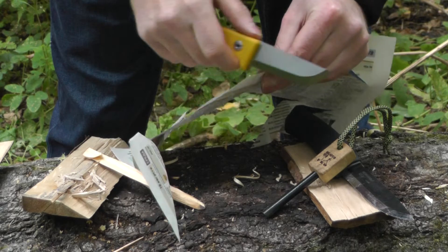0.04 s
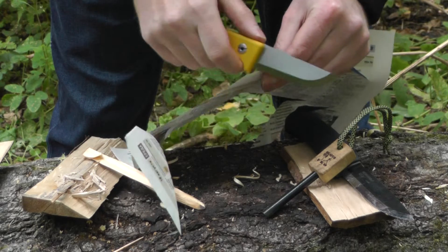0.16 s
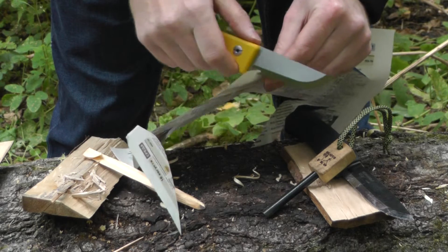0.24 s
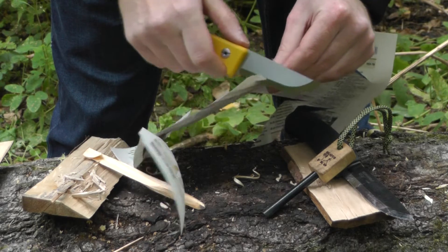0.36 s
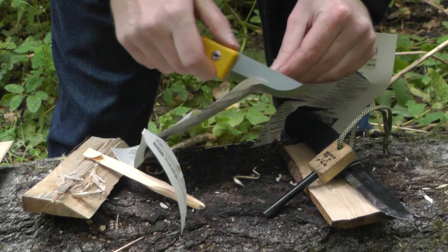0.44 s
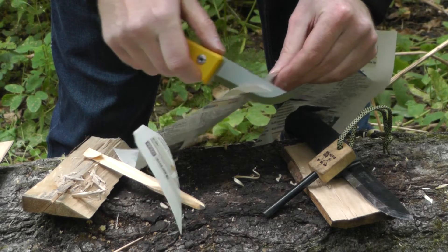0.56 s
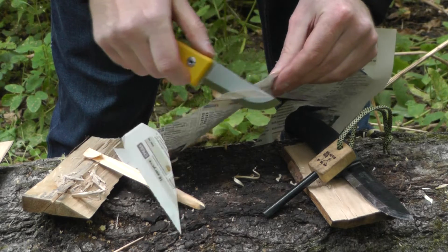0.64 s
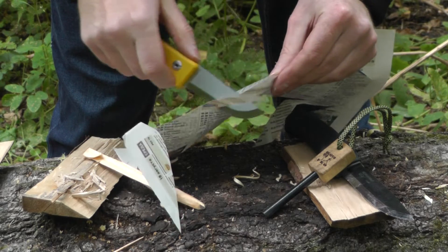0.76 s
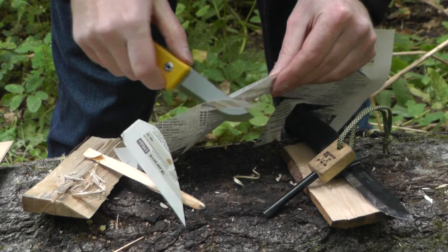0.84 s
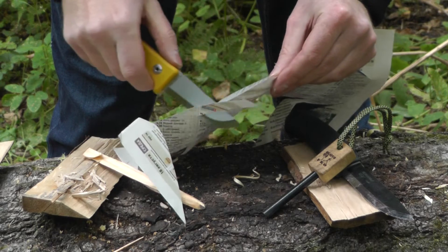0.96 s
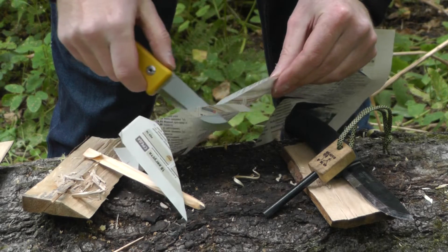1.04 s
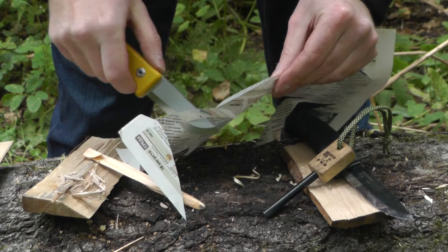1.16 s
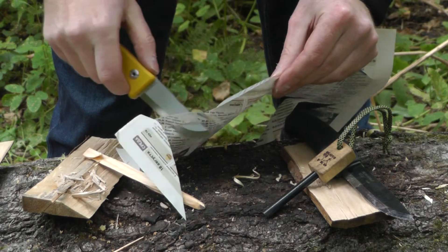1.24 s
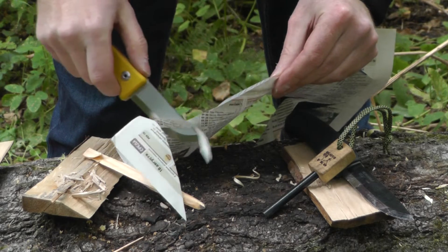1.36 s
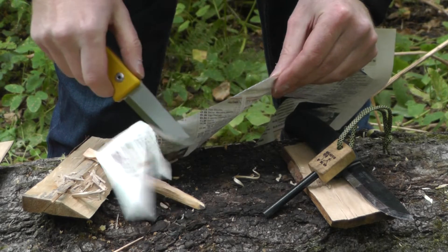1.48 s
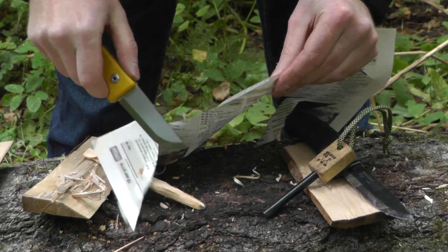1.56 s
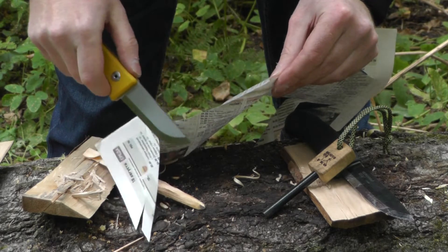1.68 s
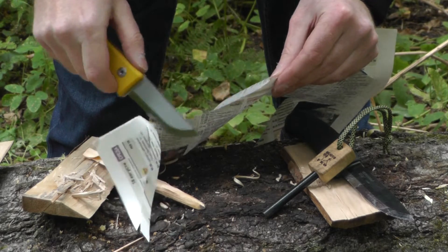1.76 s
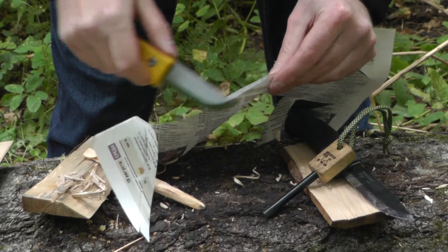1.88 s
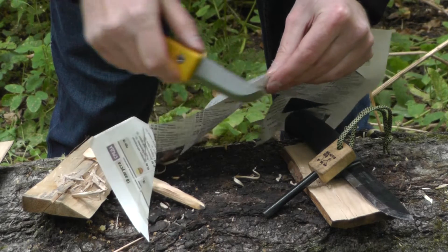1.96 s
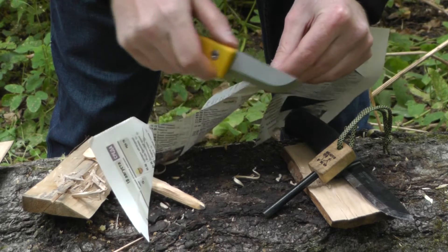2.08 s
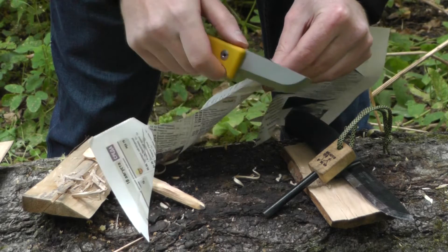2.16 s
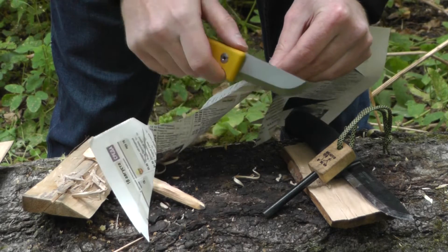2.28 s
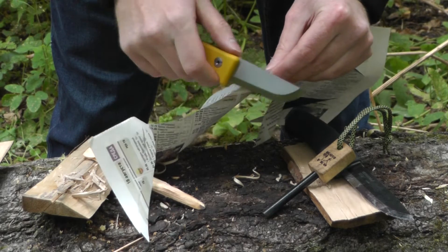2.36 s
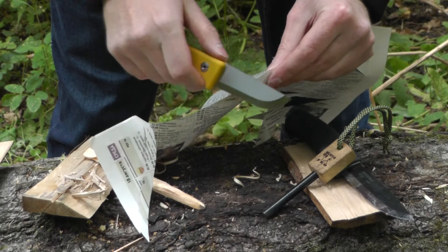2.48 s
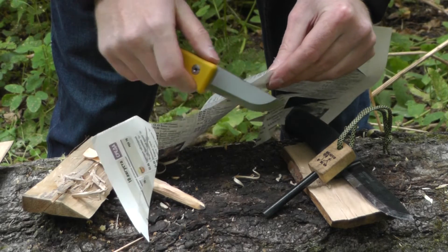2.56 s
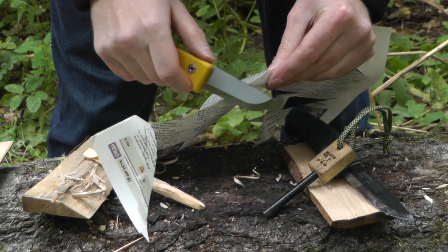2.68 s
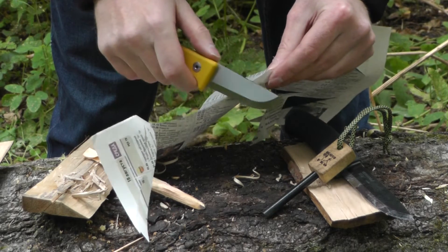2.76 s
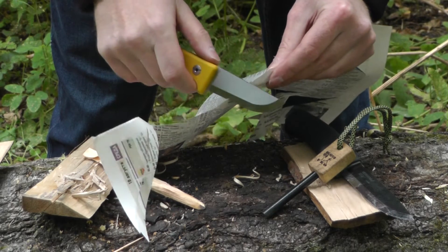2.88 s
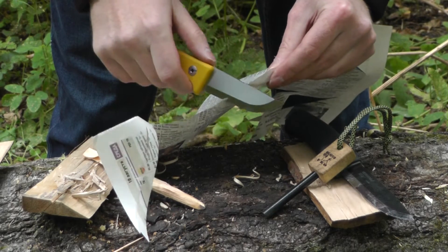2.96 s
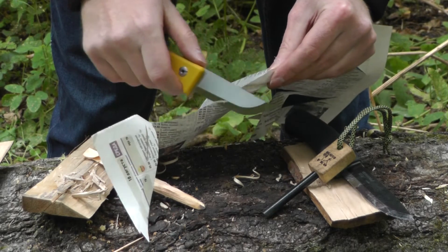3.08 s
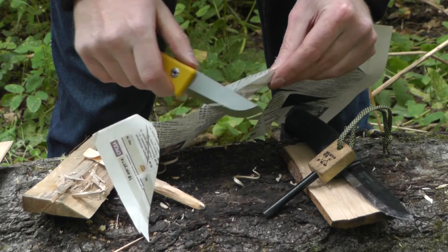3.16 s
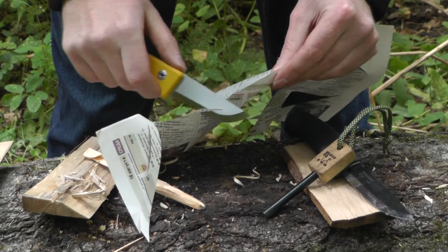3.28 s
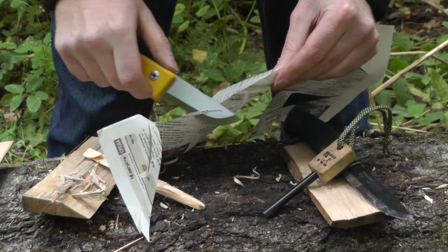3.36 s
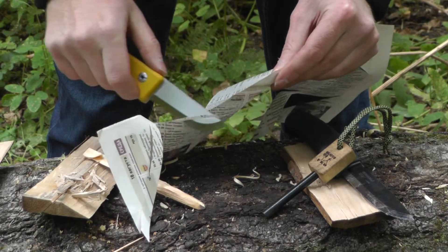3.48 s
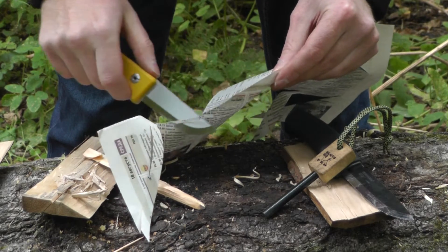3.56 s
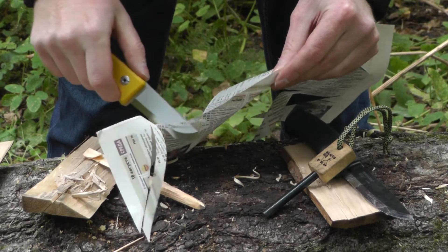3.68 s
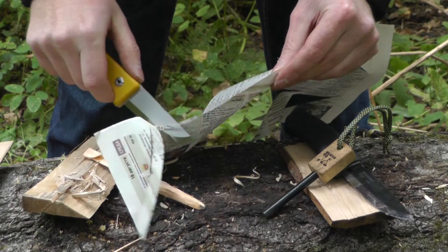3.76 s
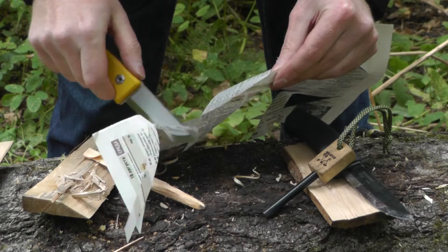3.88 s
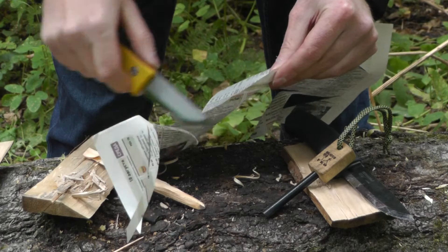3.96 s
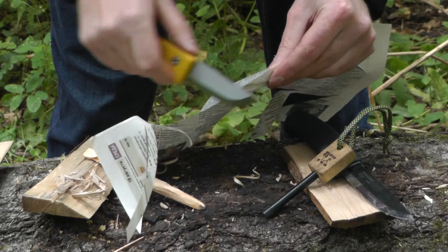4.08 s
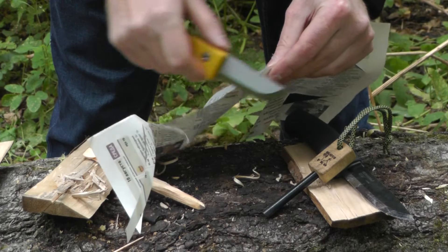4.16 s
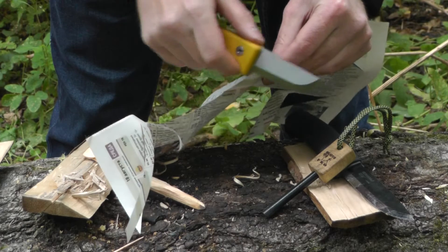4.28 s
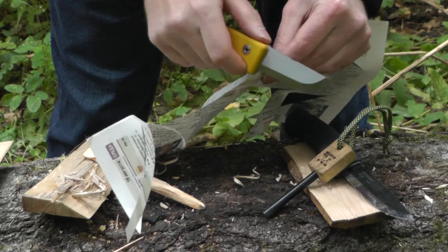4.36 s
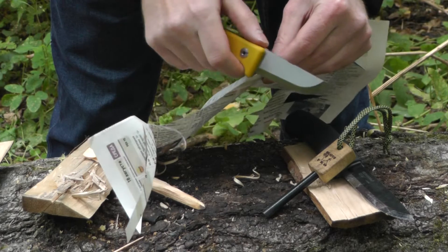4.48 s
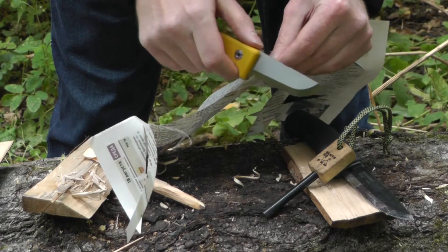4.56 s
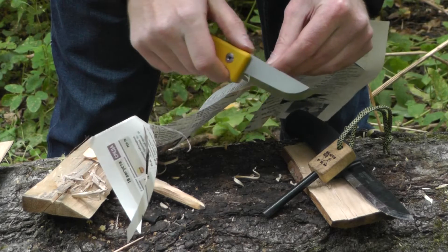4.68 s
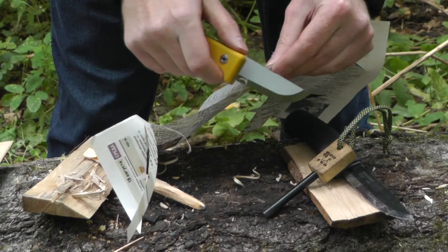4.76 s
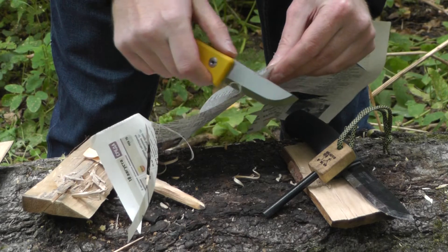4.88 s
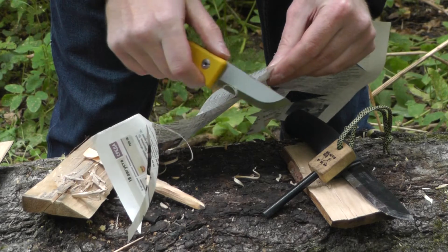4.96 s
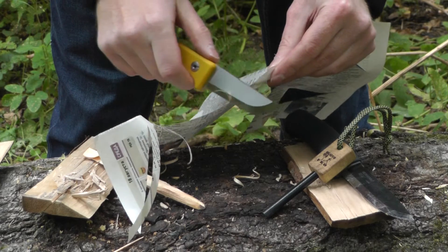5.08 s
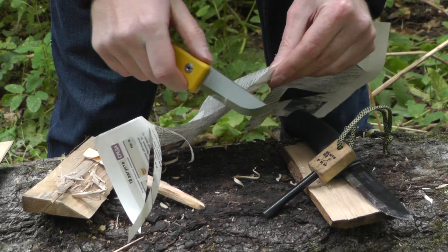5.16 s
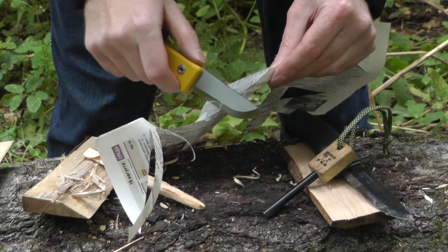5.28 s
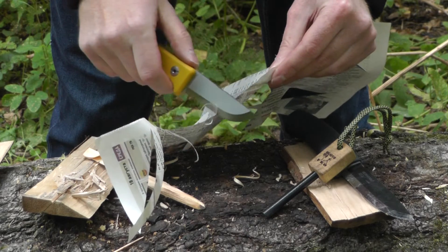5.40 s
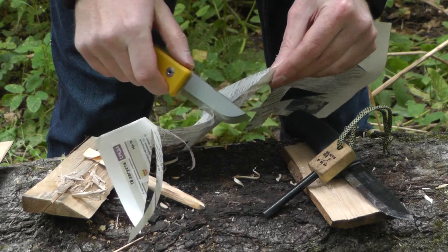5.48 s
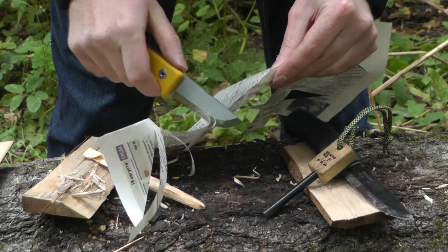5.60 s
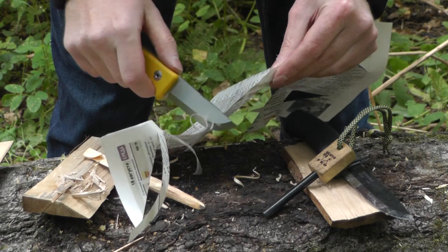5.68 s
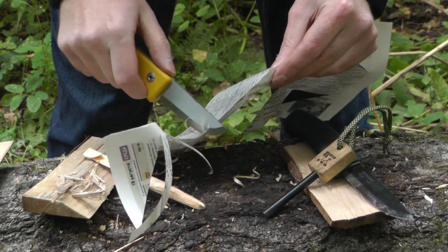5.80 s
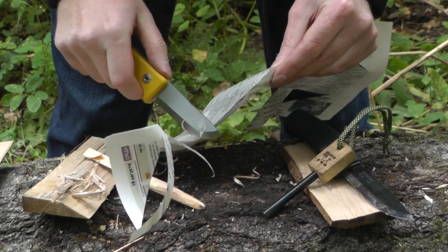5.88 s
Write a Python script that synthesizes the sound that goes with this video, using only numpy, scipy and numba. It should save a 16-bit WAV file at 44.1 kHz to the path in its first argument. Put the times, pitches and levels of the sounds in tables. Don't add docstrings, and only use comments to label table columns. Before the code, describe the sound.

A sharp knife slices a hand-held sheet of newsprint in three long rasping strokes, with crisp paper pops and faint rustles between, over distant road hum.

```python
import sys
import numpy as np
from scipy import signal
from scipy.fft import rfft, irfft
from scipy.io import wavfile
from scipy.ndimage import uniform_filter1d, map_coordinates
from numba import njit

SR = 44100
rng = np.random.default_rng(int(sys.argv[2]) if len(sys.argv) > 2 else 0)


def generate_wav(sig):
    pcm = np.round(np.clip(np.atleast_2d(sig).T, -1, 1) * 32767).astype(np.int16)
    wavfile.write(sys.argv[1], SR, pcm)


def undo_db(level):
    steps = np.asarray(level, float) / 20
    return 10 ** steps


N = 261505

FOLDED_HZ = 3850
LEVEL_LAG_MS = .42


def unit(x):
    return x / np.sqrt(np.mean(x ** 2))


def noise(shape=N):
    return rng.standard_normal(shape)


@njit
def svf(x, hz, width):
    y, band, low = np.empty(len(x)), 0., 0.
    for i in range(len(x)):
        g, k = np.tan(np.pi * hz[i] / SR), width / hz[i]
        v = (band + g * (x[i] - low)) / (1 + g * (g + k))
        band, low, y[i] = 2 * v - band, low + 2 * g * v, k * v
    return y


def ring(x, hz, width):
    return unit(svf(x, hz + np.zeros(len(x)), 1. * width))


def ring_twice(x, hz, width):
    return ring(ring(x, hz, width), hz, width)


def colour(x, points):
    hz, db = np.transpose(points)
    grid = np.maximum(np.arange(2049) * SR / 4096, 1)
    ceps = irfft(np.interp(np.log(grid), np.log(hz), db) * np.log(10) / 20)
    ceps[1:2048] *= 2
    ceps[2049:] = 0
    response = irfft(np.exp(rfft(ceps)))
    return unit(signal.fftconvolve(x, response)[:len(x)])


def walk(rate):
    k = int(SR / rate)
    steps = np.repeat(noise(N // k + 1), k)
    return unit(uniform_filter1d(uniform_filter1d(steps, k), k)[:N])


def along(table):
    s, *columns = np.transpose(table)
    return [np.interp(np.arange(N) / SR, s, c) for c in columns]


def follow(tables):
    t = np.arange(N) / SR
    on = sum((t >= table[0][0]) & (t < table[-1][0]) for table in tables)
    level_db, *others = along(np.vstack(tables))
    return [undo_db(level_db) * uniform_filter1d(1. * on, size=200)] + others


def fibres(rate, spread_db, smooth, judder_db):
    draw = rng.random((3, N))
    size = undo_db(-spread_db * np.log(draw[2] + 0.0032))
    snaps = (draw[0] < rate / SR) * np.sign(draw[1] - .5) * size
    judder = undo_db(judder_db * (walk(300) + 0.16 * walk(70)))
    return unit((unit(snaps) + smooth * noise()) * judder)


# f/Hz, level/dB [dB per Hz]
ROAD_SPECTRUM = [(15, -81), (25, -7.5), (137, -6), (222, -6), (352, -2.5), (748, 1.5), (980, -5),
                 (1150, -8.5), (1250, -10.5), (1470, -16), (2450, -21), (2810, -23.5), (4440, -27),
                 (5510, -29.5), (15800, -42)]


def woodland():
    swell_db = .3 * walk(2) + .4 * walk(9)
    hum = colour(noise(), ROAD_SPECTRUM) * undo_db(-49.5 + swell_db)
    return hum + undo_db(-66.5) * ring(noise(), 254, 8.6)


# start t/s, end t/s, first level/dB, last level/dB
STIRRINGS = [(0, .25, -71, -82), (1.66, 1.75, -65, -60.5), (1.765, 1.807, -75, -53),
             (1.833, 1.928, -65, -61), (1.93, 2, -57, -46), (2.009, 2.2, -56, -70),
             (2.204, 2.288, -57.5, -54), (2.292, 2.595, -65, -72), (2.85, 2.904, -56, -63),
             (3.906, 4.095, -61.5, -62.5), (4.108, 4.221, -66, -61), (4.256, 4.28, -54, -75),
             (4.29, 4.447, -55, -71)]


def stirring():
    gain, = follow([[(s, first), (end, last)] for s, end, first, last in STIRRINGS])
    crackle = fibres(rate=1400, spread_db=2.0, smooth=0.8, judder_db=2.2)
    body = ring(ring(crackle, 3040, 4600), 3200, 4700)
    return gain * (body + undo_db(-14.0) * sizzle(crackle))


# t/s, lag/ms by the log, lag/ms by the blade, lag/ms by the hands, strength of the log echo [0-1]
ECHO_PATHS = [(.27, .592, .348, .594, .12), (.81, .392, .295, .517, .6), (1.11, .314, .27, .486, .6),
              (1.49, .22, .2, .37, .2), (1.55, .405, .415, .313, .2), (2.61, .41, .32, .66, .33),
              (2.72, .41, .31, .65, .3), (3.05, .41, .28, .51, .33), (3.33, .336, .235, .4, .4),
              (3.85, .203, .19, .28, .25), (4.52, .581, .489, .477, .15), (5.15, .526, .455, .314, .3),
              (5.64, .469, .362, .24, .5), (5.92, .432, .325, .21, .3)]
# f/Hz, level/dB [dB per Hz]
SIZZLE_SPECTRUM = [(5000, -6.5), (5600, 2.5), (6300, 5), (8000, 2.5), (9800, 1.5), (11500, -6),
                   (13500, -15), (15800, -18.5), (16300, -21)]


def sizzle(x):
    log_ms, blade_ms, hand_ms, log_echo = along(ECHO_PATHS)
    paths = [
        (log_ms, log_echo),
        (blade_ms, .27 + .09 * walk(6)),
        (hand_ms, .22 + .08 * walk(6)),
        (.85 + .05 * walk(3), .15 + .1 * walk(6)),
    ]
    for ms, strength in paths:
        tremble_ms = .006 * walk(30)
        late = map_coordinates(x, [np.arange(N) - (ms + tremble_ms) * SR / 1000], order=3)
        late = .75 * late + .25 * uniform_filter1d(late, size=3)
        strength = np.clip(strength * (.9 + .25 * walk(14)), 0, .7)
        x = (x + strength * late) / np.sqrt(1 + strength ** 2)
    return colour(x, [(3500, -16.5)] + SIZZLE_SPECTRUM)


# t/s, peak level/dB, ring f/Hz, length/ms
EDGE_TICKS = [
    (.1531, -50, 7430, 8.8),
    (.172, -47, 7260, 7.1),
    (.1894, -50, 7470, 5),
]
# t/s, peak level/dB, ring f/Hz, length/ms
CRISP_POPS = [(0.262, -36, 3700, 3.3), (.2844, -30, 3750, 3.7), (0.4706, -24.5, 2660, 2.9),
              (1.4492, -13.5, 3650, 3.4), (1.5254, -20.5, 2200, 0.7), (1.5468, -19, 5450, 7.6),
              (1.5887, -14.5, 2600, 1.04), (1.6494, -39, 3860, 4), (1.7853, -45, 4800, 4),
              (1.8068, -34.5, 2310, 11), (2.0597, -43, 2600, 4), (2.1035, -43.5, 2230, 4.5),
              (2.2065, -40, 2380, 4), (2.2605, -38, 3760, 11), (2.2844, -41, 2400, 2.4),
              (2.6227, -34, 2600, 2.7), (2.95, -41, 12500, 14), (3.0095, -24, 2400, 3.6),
              (3.5117, -15, 2740, 3.5), (3.7961, -32, 3740, 3.3), (3.843, -19, 3160, 1.6),
              (3.852, -30, 2770, 5.1), (4.2317, -34, 2170, 11), (4.525, -40, 7500, 14),
              (4.59, -46, 8800, 14), (4.64, -34.5, 8900, 14), (0.892, -18.5, 6600, 4.3),
              (1.314, -20.5, 6960, 1.8)]
# t/s, peak level/dB, ring f/Hz, length/ms
SOFT_POPS = [(2.4448, -32, 3530, 0.48), (2.604, -29, 2600, 3), (2.732, -36, 3690, 7.6),
             (0.631, -32, 2630, 13), (4.555, -42, 2400, 14), (1.697, -40, 2590, 3.7),
             (1.815, -30, 4540, 5.1), (1.8504, -42, 1580, 4), (1.935, -39, 2090, 4),
             (1.9846, -29.5, 2220, 9.8), (2.5, -41, 2130, 1.6), (2.756, -30.5, 2160, 2.6),
             (2.87, -41, 2220, 3.6), (3.8717, -17, 3770, 1.4), (3.8795, -27, 3200, 2.7),
             (3.887, -35, 3780, 2.7), (4.129, -50, 3000, 3), (4.148, -42, 3060, 4),
             (4.1794, -41, 4410, 6.9), (4.2439, -26, 3770, 5.4), (4.2923, -34, 1910, 3.2),
             (4.313, -32.5, 2100, 5.7), (4.3228, -33, 2010, 8.7), (4.411, -40.5, 2020, 5)]


def creases():
    size = 2048
    low, top = np.zeros((2, N + size))
    t = np.arange(size) / SR
    pops = [(*row, -10.5) for row in CRISP_POPS + EDGE_TICKS]
    pops += [(*row, -43) for row in SOFT_POPS]
    for s, db, hz, ms, top_db in pops:
        crackle = noise(size) * undo_db(18 * uniform_filter1d(noise(size), size=16))
        decay = np.exp(-(t * 700 / np.clip(ms, .2, 15)) ** 2)
        burst = unit(crackle * decay * np.minimum(t / 0.00037, 1))
        pop = ring(burst, hz, 320) + 0.86 * ring_twice(burst, 0.65 * hz + 1200, 5700)
        i = int(s * SR)
        gain = undo_db(db - 2.5) / np.abs(pop).max()
        low[i:i + size] += gain * pop
        top[i:i + size] += gain * undo_db(top_db + 6.0) * burst
    return low[:N] + sizzle(top[:N]) * np.sqrt(np.mean(top ** 2))


def snag(s, hold, release, db, hz):
    edge_db, sag_db, sheet_db = -27.5, -2, -7
    bright_db = -1 + .4 * (db + 37)
    times = s + np.cumsum([0, 0.027, hold, release])
    levels = db + np.array([edge_db, 0, sag_db, sag_db + edge_db])
    return [(t, level, sheet_db, bright_db, hz) for t, level in zip(times, levels)]


# t/s, rasp level/dB, share of slack sheet level/dB, brightness level/dB, rasp ring f/Hz
FIRST_CUT = [
    (.25, -66, 2, -11, 2400),
    (.268, -49.5, -3, 0, 2460),
    (.37, -48, -14, -4.5, 2500),
    (.59, -41, -8.5, 2.5, 2680),
    (.902, -36, -5, 1, 2120),
    (1.072, -36, -7, -2.5, 1980),
    (1.384, -31.5, -5, -3.5, 2250),
    (1.49, -32, -7, -1.5, 2540),
    (1.512, -50, -10, 9, 2670),
]
SECOND_CUT = [
    (2.9, -57, 7, -15, 2500),
    (2.946, -42.5, -10, 2, 2530),
    (3.34, -32, -12, -2, 2520),
    (3.37, -35.5, -4, -1.5, 2400),
    (3.61, -34, -3, 1, 2800),
    (3.72, -33, -5, -2.5, 2640),
    (3.829, -29.5, -6.5, -3, 2480),
    (3.866, -37, -4, -6.5, 2750),
    (3.9, -50, -15, -11, 2750),
]
THIRD_CUT = [
    (4.44, -62.5, -3, -4.5, 2570),
    (4.604, -44.5, -25, -8, 1950),
    (4.676, -54, -0.5, -1, 2530),
    (5.05, -50, -5, 0.5, 2350),
    (5.098, -42, -6.5, -5.5, 2120),
    (5.2, -43, -6, -3, 2280),
    (5.508, -40, -9.5, -7, 2420),
    (5.582, -41.5, -3, -2, 2420),
    (5.93, -40.5, -5, -9, 2380),
]
# start t/s, hold/s, release/s, level/dB, ring f/Hz
CATCHES = [
    (1.519, 0.042, 0.072, -36.5, 2320),
    (2.595, 0.086, 0.017, -38, 2500),
    (2.728, .02, .016, -49.5, 2170),
]
# start t/s, fold t/s, first f/Hz, last f/Hz
RING_CLIMBS = [
    (.25, 0.885, 3700, 4600),
    (1.52, 1.66, 4400, 4050),
    (2.595, 3.332, 4000, 4500),
    (5.203, 5.65, 3860, 4350),
]
# t/s, tautness level/dB
HAND_PULL = [(.35, -3), (.6, 8), (.95, 1.5), (1.4, -5), (2.62, -1), (2.94, -18), (3.32, 7), (3.86, 0.5),
             (4.5, 8), (5.17, -10), (5.5, -26), (5.58, 2.5)]


def blade():
    cuts = [FIRST_CUT, SECOND_CUT, THIRD_CUT] + [snag(*row) for row in CATCHES]
    gain, body_db, bright_db, rasp_hz = follow(sorted(cuts, key=lambda table: table[0][0]))
    top_db = -0.67 + bright_db + 16 * (along(ECHO_PATHS)[0] - LEVEL_LAG_MS)
    fold_s = .09
    upper = []
    for s, fold, first, last in RING_CLIMBS:
        upper += [(s - fold_s, FOLDED_HZ), (s, first), (fold, last), (fold + fold_s, FOLDED_HZ)]
    return gain, body_db, bright_db, top_db, along(HAND_PULL)[0], rasp_hz, along(upper)[0]


def slicing():
    gain, body_db, upper_db, top_db, taut_db, rasp_hz, upper_hz = blade()
    log_ms, _, hand_ms, _ = along(ECHO_PATHS)
    rasp = fibres(rate=5500, spread_db=3.0, smooth=0.43, judder_db=1.2)

    slack = colour(rasp, [(200, -50.5), (420, -5), (620, 6), (800, 0.5), (1050, 1.5), (1250, -4.5), (1800, -51.5)])
    taut = ring_twice(rasp, 1315, 710)
    share = undo_db(taut_db) / np.sqrt(1 + undo_db(2 * taut_db))
    body = np.sqrt(1 - share ** 2) * slack - share * taut

    spread = 0.086 + 2.0 * share * undo_db(np.clip(body_db, -20, 0))
    middle = ring_twice(rasp, 0.6 * rasp_hz + 1000, 1260)
    lower = (ring(rasp, rasp_hz, 310) + spread * middle) / (1 + spread)

    wide = colour(rasp, [(2400, -12.5), (3200, -1), (4700, 3.5), (5500, 2.5), (6200, -33.0)])
    focus = 1.22 * np.exp(-0.5 * (log_ms - .33) - (upper_hz - FOLDED_HZ) / 1100)
    upper = unit(focus * ring(rasp, upper_hz, 400) + wide) * undo_db(walk(16))

    top = sizzle(rasp + .5 * noise()) * undo_db(1.75 * walk(24.18))
    air_db = -4 + 17 * (hand_ms - LEVEL_LAG_MS) + 1.8 * walk(12)
    top = top + undo_db(air_db) * 0.21 * ring(rasp, 12400, 6000)

    out = lower + undo_db(body_db) * body - undo_db(upper_db) * upper + undo_db(top_db) * top
    depth = np.clip(0.55 - 1.8 * np.maximum(log_ms - LEVEL_LAG_MS, 0), 0, .8)
    return gain * (out - depth * svf(out, 0.757 * upper_hz + 2050, 470.0))


def snap():
    push = np.exp(-.5 * ((np.arange(N) / SR - 2.8485) / .00006) ** 2)
    out = ring(push, 2750, 300) - 0.52 * ring(push, 1000, 900) + 0.27 * ring(push, 4100, 700)
    return undo_db(-17.5) * out / np.abs(out).max()


def scene():
    return (woodland() + stirring() + creases() + slicing() + snap())[None]


def roll_off(x):
    return signal.sosfilt(signal.butter(12, 15920, fs=SR, output="sos"), x)


def record(dry):
    heard = signal.sosfilt(signal.butter(1, 45, "high", fs=SR, output="sos"), dry)
    mix = heard + undo_db(-68) * noise(dry.shape)
    return roll_off(mix)


dry = scene()
out = record(dry)
generate_wav(out)
```